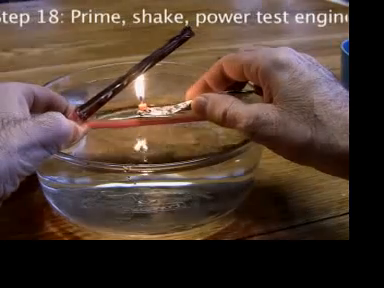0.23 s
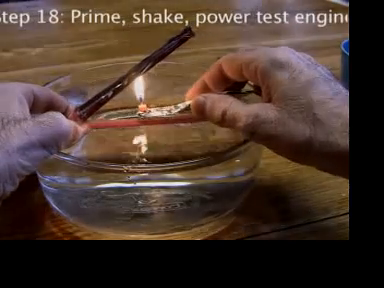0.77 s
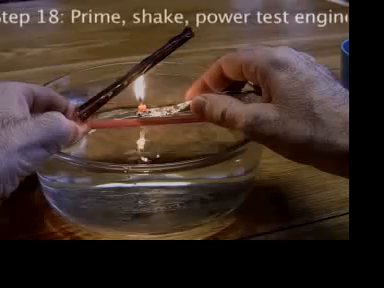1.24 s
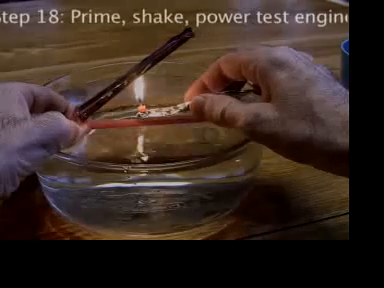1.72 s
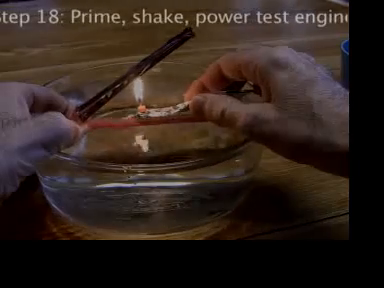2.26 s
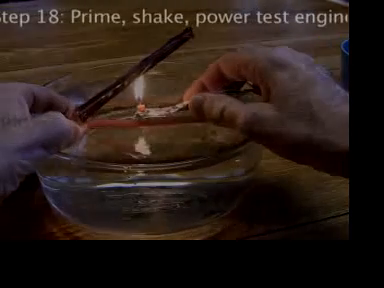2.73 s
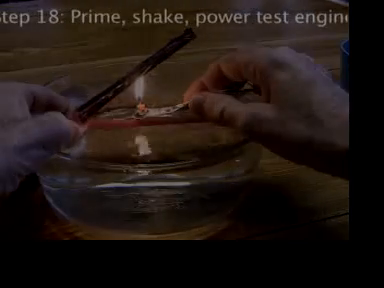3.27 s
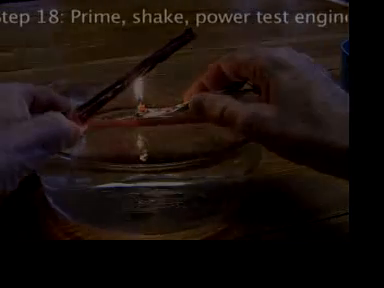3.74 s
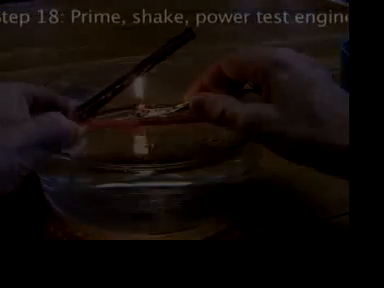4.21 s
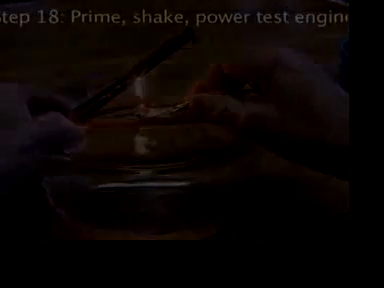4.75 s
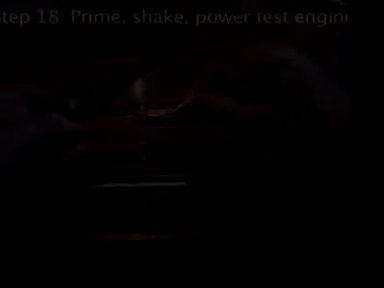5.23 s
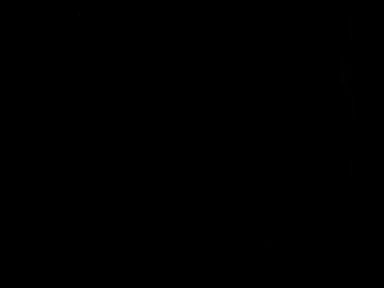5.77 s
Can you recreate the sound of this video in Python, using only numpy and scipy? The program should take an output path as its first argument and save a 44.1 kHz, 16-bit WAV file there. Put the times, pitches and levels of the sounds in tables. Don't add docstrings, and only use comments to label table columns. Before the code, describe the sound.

A thin tin boiler lid over a candle snaps in and out about ten times a second, each cycle a tight cluster of metallic clicks and a lighter tick. It starts quietly, surges to loud, crisp clacking after a second and a half, then weakens and fades by six seconds. Close microphone in a quiet room, with short reflections from bowl and table.

```python
import sys
import numpy as np
from scipy import signal
from scipy.fft import rfft, irfft, next_fast_len
from scipy.io import wavfile
from scipy.ndimage import uniform_filter1d

SR = 44100
rng = np.random.default_rng(int(sys.argv[2]) if len(sys.argv) > 2 else 0)


def gain_from_db(level_db):
    decades = np.asarray(level_db, float) / 20
    return 10 ** decades


def unload_audio(sound):
    columns = np.transpose(np.atleast_2d(sound))
    steps = np.round(np.clip(columns, -1, 1) * 32767)
    wavfile.write(sys.argv[1], SR, steps.astype(np.int16))


N = 264114
GRAIN, ROOM = 900, 9000
LONG = next_fast_len(N + 9000, True)
MUTE = 200
TICK_SLOWER, WEAK_SLOWER = 1.3, 1.1


def colour(x, points):
    hz, db = np.transpose(points)
    f = np.arange(x.shape[-1] // 2 + 1) * SR / x.shape[-1]
    gain = gain_from_db(np.interp(np.log(f + 1), np.log(hz), db, left=-80, right=-80))
    return irfft(rfft(x) * gain / np.sqrt(np.mean(gain ** 2)), x.shape[-1])


# f/Hz, level/dB
AIR = [(30, -15), (120, 0), (1200, -10.5), (8000, -18), (15500, -21)]
# t/s, level/dB
AIR_LEVEL = [(0, -65.5), (1.2, -77), (1.6, -53), (3.4, -56.5), (6.0, -72.5)]


def air():
    mid, side = colour(rng.standard_normal((2, LONG)), AIR)[:, :N]
    t, db = np.transpose(AIR_LEVEL)
    level = gain_from_db(np.interp(np.arange(N) / SR, t, db))
    return level * (mid + 1.3 * side * np.array([[1], [-1]]))


# t/s, dome level/dB
SETTLES = [(0.008, -35), (0.0988, -39), (0.19, -35), (0.5477, -39), (1.009, -39.5), (1.1994, -37),
           (1.294, -31), (1.391, -30), (1.486, -26.5), (1.5793, -24), (1.7696, -19.5), (1.8646, -19),
           (2.047, -24.5), (2.1455, -21), (2.2458, -19.5), (2.3484, -19), (2.449, -18),
           (2.546, -21.5), (2.6485, -18.5), (2.7498, -21.5), (2.8498, -20), (2.9536, -21.0),
           (3.0585, -21.5), (3.161, -20.5), (3.2688, -26), (3.375, -27),
           (3.689, -27), (3.799, -26.5), (3.91, -25.5), (4.0159, -26), (4.119, -27), (4.2227, -23),
                (4.329, -26), (4.434, -25.5), (4.542, -26), (4.64, -23.5), (4.748, -27), (4.854, -26),
                (4.9606, -28), (5.0653, -29), (5.171, -30.5), (5.271, -32), (5.377, -33.5), (5.481, -34)]
# t/s, dome level/dB
STRAYS = [
    (1.136, -44),
    (1.317, -33),
    (3.476, -27),
    (3.5807, -35),
    (4.4293, -37),
    (5.5854, -36),
    (5.6822, -45),
    (5.789, -42),
    (5.8966, -50),
]
# buckle f/Hz; buckle, rim, crack level/dB over the dome
SETTLE = (1840, -1.2, -4.5, -15.5)


def settles():
    t, dome_db = np.transpose(SETTLES + STRAYS)
    hz, buckle, rim, crack_over = SETTLE
    return t, dome_db, hz, dome_db + buckle, dome_db + rim, dome_db + crack_over, TICK_SLOWER


# t/s, dome level/dB
LIFTS = [(0.025, -27.5), (0.122, -31), (0.2166, -28.5), (0.3086, -32), (0.3968, -32.5), (0.48, -37),
         (0.574, -34), (0.6656, -36.5), (0.756, -39), (0.846, -40), (0.9407, -38), (1.036, -36.0),
         (1.129, -37), (1.227, -32), (1.3207, -27), (1.4153, -24), (1.5123, -19.5), (1.6065, -15),
         (1.702, -16), (1.7976, -17), (1.8918, -14), (1.979, -17), (2.0726, -18), (2.1716, -14.5),
         (2.274, -14.5), (2.3754, -16), (2.476, -14.5), (2.5744, -14.5), (2.677, -16), (2.7794, -17),
         (2.88, -15), (2.9829, -16), (3.0885, -17), (3.189, -17.5), (3.297, -20.5), (3.405, -19),
              (3.511, -19), (3.614, -20.5), (3.7151, -23.5), (3.826, -23), (3.937, -19), (4.044, -17.5),
              (4.148, -19), (4.2506, -19), (4.356, -21), (4.461, -21.5), (4.5686, -22.5), (4.668, -20),
              (4.774, -22.5), (4.8814, -24.5), (4.987, -25.5), (5.093, -26.5), (5.196, -28.5), (5.3, -28),
              (5.4063, -31.5), (5.5153, -25), (5.62, -26.5), (5.717, -27.5), (5.824, -30), (5.932, -35.5)]
# buckle f/Hz; buckle, rim, crack level/dB over the dome
LIFT = (2346.5, -4, -15.5, -13.5)
# from t/s, buckle f/Hz, added buckle level/dB
LIFT_SLACK = (5.46, 1840, 2.4)
# until t/s, added buckle level/dB
COLD_LIFT = (1.45, -3)


def lifts():
    t, dome_db = np.transpose(LIFTS)
    hz, buckle, rim, crack_over = LIFT
    slack_from, slack_hz, slack_db = LIFT_SLACK
    cold_until, cold_db = COLD_LIFT
    slack = t > slack_from
    buckle_db = dome_db + buckle + slack * slack_db + cold_db * (t < cold_until)
    return t, dome_db, np.where(slack, slack_hz, hz), buckle_db, dome_db + rim, dome_db + crack_over, TICK_SLOWER


# t/s, buckle level/dB
PULLS_EARLY = [(0.053, -26), (0.1433, -25), (0.2326, -25), (0.323, -28.5), (0.409, -26), (0.499, -30),
               (0.59, -28), (0.6812, -28.5), (0.771, -29), (0.863, -31), (0.96, -32), (1.052, -29),
               (1.147, -32), (1.2444, -25.5), (1.3377, -21), (1.44, -17), (1.533, -13), (1.6239, -8),
               (1.7172, -10), (1.815, -7), (1.9062, -6), (1.998, -11.5), (2.0933, -10.5), (2.1931, -9),
               (2.2934, -7), (2.3948, -7.0), (2.4966, -8), (2.5913, -7), (2.694, -6), (2.7966, -7)]
PULLS_LATE = [(2.8973, -7.5), (3.0012, -7), (3.1072, -7), (3.2072, -7.5), (3.3194, -10), (3.4232, -10),
              (3.524, -13.5), (3.634, -18), (3.738, -16.5), (3.8504, -14), (3.962, -14), (4.0672, -11),
              (4.171, -12.5), (4.284, -13.5), (4.386, -13), (4.4933, -13.5), (4.693, -13), (4.804, -13.0),
              (4.91, -14.5), (5.017, -16.5), (5.1234, -17.5), (5.223, -18), (5.3255, -19.5), (5.429, -21.5),
              (5.534, -26), (5.6337, -30), (5.735, -31.5), (5.841, -35), (5.947, -37)]
# t/s, buckle f/Hz, dome level/dB over the buckle
TENSION = [(0, 1590, 3), (.25, 1944, -2.5), (.6, 1960, -9), (1.2, 1913, -3.5), (1.9, 1938, -6),
           (2.0, 1770, -5.5), (2.7, 1760, -7), (3.3, 1810, -5), (3.55, 1842, -20), (4.07, 1944, -8),
           (4.18, 2150, -6), (4.45, 2360, -9), (5.9, 2221, -19)]
# buckle f/Hz; rim, crack level/dB over the buckle
PULL_EDGE = [(2020, -18, -25), (2130, -4, -12)]


def pulls():
    t, db = np.transpose(PULLS_EARLY + PULLS_LATE)
    tension_t, tension_hz, tension_dome = np.transpose(TENSION)
    hz = np.interp(t, tension_t, tension_hz)
    dome_db = db + np.interp(t, tension_t, tension_dome)
    edge_hz, edge_rim, edge_crack = np.transpose(PULL_EDGE)
    rim_db = db + np.interp(hz, edge_hz, edge_rim)
    crack_db = db + np.interp(hz, edge_hz, edge_crack)
    return t, dome_db, hz, db, rim_db, crack_db, 1


# t/s, level/dB
KNOCKS = [
    (.06, -64),
    (3.488, -49),
    (4.22, -44),
    (4.8, -55),
]


def knocks():
    t = np.arange(N) / SR
    swell = sum(gain_from_db(db) * np.exp(-np.abs(t - at) / 0.027) for at, db in KNOCKS)
    return swell * colour(rng.standard_normal((2, LONG)), [(25, -5), (250, -6)])[:, :N]


# t/s, buckle level/dB, buckle f/Hz, dome level/dB,
# rim level/dB
POPS = [(0.076, -28.5, 1930, -23, -29.5), (0.1741, -29, 1960, -24.5, -33),
        (0.2671, -24.5, 2300, -26, -33.5), (0.3571, -24, 2270, -26.5, -33),
        (0.442, -23, 2260, -30, -35), (0.531, -38, 2300, -33.5, -38), (0.6263, -22, 2320, -27.5, -37),
        (0.717, -25.5, 2250, -29, -34.5), (0.807, -23.5, 2350, -31, -35.5),
        (0.8993, -24, 2350, -31, -37), (0.993, -40, 1840, -34.5, -38.5),
        (1.087, -25.5, 2350, -28.5, -33.5), (1.182, -35, 1930, -34.5, -38.5),
        (1.279, -20, 2343, -23, -26.5), (1.37, -20.5, 2330, -18.5, -30), (1.466, -21.5, 1820, -18, -21),
        (1.563, -17, 1840, -15.5, -17), (1.659, -6.5, 2300, -17, -14), (1.7534, -9, 1940, -16, -14.5),
        (1.85, -8.5, 2357, -11.5, -10.5),
        (1.939, -5, 2310, -13, -12), (2.03, -14, 1890, -25.0, -16), (2.1255, -15, 1840, -14.5, -16.5),
             (2.227, -13.5, 1840, -10, -15.5), (2.3283, -8.5, 2330, -11.5, -9.5),
             (2.429, -8.5, 2365, -10.5, -11.5), (2.5284, -13, 2345, -12, -16.5), (2.63, -7, 1860, -12, -12),
             (2.732, -6, 2334, -6, -20.5), (2.8335, -8.5, 1840, -9.5, -16), (2.9349, -8.5, 2043, -8, -17),
             (3.0408, -7.5, 1930, -12, -18.5), (3.146, -7.5, 1930, -8.5, -14.5),
             (3.251, -9.5, 2328, -10, -12.5), (3.3574, -11, 1810, -11, -14),
             (3.4604, -17, 1920, -15.5, -21), (3.563, -22.0, 1870, -16, -27),
             (3.6675, -17.5, 1920, -23, -29), (3.774, -13, 1760, -29, -22.5),
             (3.885, -15, 1750, -20, -20.5),
        (3.996, -14, 1796, -19, -16.5), (4.1005, -15, 1790, -20, -16.5),
              (4.2028, -17, 2310, -19.5, -21), (4.305, -14, 1764, -18.5, -28), (4.411, -18, 1810, -21, -24),
              (4.517, -18.5, 1810, -24, -26), (4.7242, -18.5, 2130, -43, -26),
              (4.8308, -22, 1960, -30, -25.5), (4.938, -23, 1820, -35, -29.5),
              (5.0447, -25.5, 1840, -24, -31.5), (5.149, -26, 1800, -33, -34),
              (5.2547, -26.5, 1836, -39, -31.5), (5.358, -27, 1750, -31.5, -36),
              (5.464, -26.5, 1860, -26, -33), (5.5707, -34, 1800, -30.5, -34), (5.67, -34, 1860, -34, -37),
              (5.7734, -39.0, 1855, -38, -40.5), (5.8816, -36, 1730, -40.5, -40.5),
              (5.9865, -49, 1810, -37, -45)]
# t/s, crack level/dB of a pop
DRYNESS = [(0, -8.5), (.3, -7.5), (.6, -3.5), (1.15, -5.5), (1.45, -9), (2.0, -11), (2.65, -10.5),
           (2.75, -14.5), (3.05, -16), (3.15, -4), (3.3, -16.5), (4.1, -12), (4.3, -10.5), (6, -13.5)]
WEAK_POP_DB = -5
POP_CRACK_FROM_RIM = 0.61


def pops():
    t, db, hz, dome_db, rim_db = np.transpose(POPS)
    pull_t, pull_db = np.transpose(PULLS_EARLY + PULLS_LATE)
    weak = db < np.interp(t, pull_t, pull_db) + WEAK_POP_DB
    dryness_db = np.interp(t, *np.transpose(DRYNESS))
    crack_db = db + POP_CRACK_FROM_RIM * (rim_db - db) + dryness_db
    return t, dome_db, hz, db, rim_db, crack_db, np.where(weak, WEAK_SLOWER, 1)


# t/s, buckle level/dB, buckle f/Hz, dome level/dB
REPEATS = [(0.239, -30, 1590, -36), (0.328, -29, 2200, -29), (0.599, -29.5, 2140, -36),
           (0.69, -31.5, 2150, -35), (0.777, -36, 2120, -40), (0.876, -33.0, 2130, -34),
           (1.0597, -34, 1600, -33), (1.254, -27.5, 2370, -29), (1.3492, -22.5, 2020, -35),
           (1.7234, -15, 2220, -17), (2.3063, -11.5, 1620, -17), (2.407, -14.5, 1600, -12.5),
           (3.114, -21, 1607, -23), (3.221, -14, 1970, -25), (3.4636, -18.5, 2330, -17),
           (3.8595, -32, 1850, -21)]
# t/s, buckle level/dB, buckle f/Hz, dome level/dB
JOLTS = [
    (3.5113, -16, 1690, -10),
    (3.6134, -15, 2210, -24),
]
# level/dB over the buckle, each
REPEAT_EDGE = (-8.5, -15.5)


def repeats_and_jolts():
    t, db, hz, dome_db = np.transpose(REPEATS + JOLTS)
    rim, crack_over = REPEAT_EDGE
    return t, dome_db, hz, db, db + rim, db + crack_over, 1


# t/s, buckle level/dB, rim level/dB
RAPS = [
    (3.486, -14, -9.5),
    (3.591, -14.5, -12.5),
    (5.492, -26.5, -24.5),
    (5.5901, -29, -26.5),
    (5.69, -33, -29.5),
    (5.7958, -34, -30.5),
    (5.9024, -35.5, -33),
]
# buckle f/Hz, dome level/dB over the row, crack level/dB over the rim, buckle level/dB over the row
RAP = (2468, 1.5, -6, -3.5)
# delay/ms, buckle f/Hz, level/dB
SLAP = (11, 1600, -5.5)


def raps():
    t, db, rim_db = np.transpose(RAPS)
    hz, dome, crack_over, buckle = RAP
    return t, db + dome, hz, db + buckle, rim_db, rim_db + crack_over, 1


def slaps():
    t, db, _ = np.transpose(RAPS)
    delay_ms, hz, step = SLAP
    return t + delay_ms / 1000, db - MUTE, hz, db + step, db + 2 * step, db + 3 * step, 1


def strokes():
    kinds = pulls(), pops(), lifts(), settles(), raps(), slaps(), repeats_and_jolts()
    return np.hstack([np.broadcast_arrays(*kind) for kind in kinds])


RING_MS = 4.5


def bursts(s, db, waves, rise_ms, delay_ms, ring_db=-30):
    t = np.arange(GRAIN) / SR * 1000 / rise_ms[:, None]
    swell = (t * np.exp(1 - t)) ** 2.54
    ring = (1 - np.exp(-t ** 2)) * np.exp(-t * rise_ms[:, None] / RING_MS)
    shape = swell + gain_from_db(ring_db) * ring
    out = np.zeros(N + 2 * GRAIN)
    at = ((s + delay_ms / 1000) * SR).astype(int)[:, None] + np.arange(GRAIN)
    np.add.at(out, at, gain_from_db(db)[:, None] * shape * waves)
    return out[:N]


# delay/ms, level/dB
ECHOES = [(7.9, -2), (14.5, -11.5)]
TREBLE_T60_S = 0.26


def room(x, echo_db, tail_db, t60, side_db):
    t = np.arange(ROOM) / SR
    grit = rng.standard_normal((2, ROOM)) * gain_from_db(4.25 * rng.standard_normal((2, ROOM)))
    dull = uniform_filter1d(grit, size=3)
    grit = dull + (grit - dull) * gain_from_db(-60 * t / TREBLE_T60_S)
    mid, side = grit * gain_from_db(tail_db - 15 - 60 * t / t60) * np.clip(t / .006, 0, 1)
    mid[0] = 1
    for ms, db in ECHOES:
        mid[int(ms * SR / 1000)] += gain_from_db(db + echo_db)
    slope = np.gradient(np.roll(mid, 2)) * SR / (2 * np.pi * 2500)
    side = gain_from_db(side_db) * (1.6 * side - slope)
    return rfft(x, LONG) * rfft(np.array([mid + side, mid - side]), LONG)


def mode(s, db, voice, hz=0.95, sign=1, slower=0.83):
    centre_hz, rise_ms, delay_ms, gain_db, *space, ring_db = voice
    chance = rng.standard_normal((len(s), 3))
    hz = hz * centre_hz * np.exp(.025 * chance[:, 0])
    phase = 0.61 * chance[:, 1:2]
    waves = sign * np.sin(2 * np.pi * hz[:, None] * np.arange(GRAIN) / SR + phase)
    rise_ms = slower * rise_ms * np.exp(0.15 * chance[:, 2])
    return room(bursts(s, db + gain_db, waves, rise_ms, delay_ms, ring_db), *space)


# rise/ms, delay/ms, gain/dB, echo level/dB, tail level/dB, tail t60/s, side level/dB
CRACK = (1.1951, 0.41, 1.85, -17, -25.5, 0.32, -9.5)
# f/Hz, level/dB
CRACK_COLOUR = [(3800, 3.5), (4500, -2.5), (6100, -1.3), (7100, -9.5), (9000, -14), (12000, -21),
                (16300, -32)]
# f/Hz, level/dB
PULL_COLOUR = [(3900, 4.5), (4500, 2), (5100, 4), (6500, -14), (8500, -4), (12000, -20), (16300, -29.5)]


def crack(s, db, soft, pull):
    rise_ms, delay_ms, gain_db, echo_db, tail_db, t60, side_db = CRACK
    noise = rng.standard_normal((2, len(s), GRAIN))
    waves = np.where(pull[:, None], colour(noise, PULL_COLOUR), colour(noise, CRACK_COLOUR))
    mid, side = np.where(soft[:, None], uniform_filter1d(waves, size=3), waves)
    side = side - np.roll(side, 1, axis=1)
    mid, side = (bursts(s, db + gain_db, wave, rise_ms + 0 * s, delay_ms) for wave in (mid, side))
    centre = room(mid, echo_db, tail_db, t60, -26.5)
    return centre + gain_from_db(side_db) * rfft(side, LONG) * np.array([[1], [-1]])


# f/Hz (1 where each event tunes it), rise/ms, delay/ms, gain/dB,
# echo level/dB, tail level/dB, tail t60/s, side level/dB, ring level/dB
THUMP = (510, 0.86, 0.13, -10, -17, -21, 0.21, -17.5, -16)
DOME = (1, 1.02, 0.79, 0, -7, -25, 0.27, -24, -10)
DOME_TICK = (1, 2, 0.96, 0.73, -7, -23, 0.3, -29, -20)
RIM = (1, 1.33, 0.79, 1.48, -7, -27.5, 0.32, -19.5, -16.5)
TAUT = (1, 1.8, 0.5, 1.5, -24, -28, 0.2, -26, -17.5)
SLACK = (1, 0.55, 0.52, 2.5, -11, -23, 0.27, -23, -11)
BOWL = (915, 5., 9, -17.5, -44, -26, 0.95, -20, -32)
# buckle f/Hz, dome f/Hz, rim f/Hz
TUNING = [(1745, 1380, 3206), (2342, 1172, 3250), (2403, 835, 3080)]
# delay/ms, level/dB
REBOUND = (4.52, -7.5)
REBOUND_CRACK_MS, REBOUND_CRACK_DB = 4.5, -8
SETTLE_DOME_HZ = 1088
BOWL_TAUT_DB, PULL_QUICKER = -4.5, 0.72


def boiler():
    s, dome_db, buckle_hz, buckle_db, rim_db, crack_db, slower = strokes()
    tuning_hz, tuning_dome, tuning_rim = np.transpose(TUNING)
    rim_hz = np.interp(buckle_hz, tuning_hz, tuning_rim)
    dome_hz = np.interp(buckle_hz, tuning_hz, tuning_dome)
    settling = buckle_hz == SETTLE[0]
    dome_hz = np.where(settling, SETTLE_DOME_HZ, dome_hz) * np.exp(0.038 * rng.standard_normal(len(s)))
    dome_db = dome_db - 2.1 * settling
    tick = slower == TICK_SLOWER
    pull = np.arange(len(s)) < len(PULLS_EARLY + PULLS_LATE)

    lid = mode(s[tick], dome_db[tick], DOME_TICK, dome_hz[tick], -1.056)
    lid = lid + mode(s[~tick], dome_db[~tick], DOME, dome_hz[~tick], -1.056)

    taut = buckle_hz > 2130
    pace = np.where(pull & taut, PULL_QUICKER, 1) * 0.75
    lid += mode(s, buckle_db - MUTE * ~taut, TAUT, buckle_hz, slower=pace)
    lid += mode(s, buckle_db - MUTE * taut, SLACK, buckle_hz, slower=pace)
    again = pull & (buckle_hz < 1930) & (rim_db < buckle_db - 12)
    bounce_ms, bounce_db = REBOUND
    again_db = buckle_db + bounce_db - MUTE * ~again
    lid += mode(s + bounce_ms / 1000, again_db, SLACK, 0.84 * buckle_hz, slower=0.78)

    lid += mode(s, buckle_db, THUMP, 2 ** rng.uniform(-0.32, 0.35, len(s)), -0.92)
    lid += mode(s, rim_db, RIM, rim_hz)
    inward = pull | (buckle_hz == RAP[0])
    bowl_db = buckle_db + BOWL_TAUT_DB * (pull & taut)
    lid += mode(s[inward], bowl_db[inward], BOWL)

    edge_s = np.r_[s, s[again] + REBOUND_CRACK_MS / 1000]
    edge_db = np.r_[crack_db, crack_db[again] + REBOUND_CRACK_DB]
    soft = np.r_[(slower > 1) | again, again[again]]
    lid += crack(edge_s, edge_db, soft, np.r_[pull, pull[again]])
    return irfft(lid, LONG)[:, :N]


def scene():
    no_bass = signal.butter(3, 140, "high", fs=SR, output="sos")
    return signal.sosfilt(no_bass, boiler()) + knocks() + air()


STARVED_SHARE, STARVED_FROM_HZ, STARVED_DB = 0.3, 7500, 3.5


def starve(x):
    hz, t, cells = signal.stft(x, SR, nperseg=256)
    db = 20 * np.log10(np.abs(cells) + 1e-9)
    usual = uniform_filter1d(uniform_filter1d(db, size=41, axis=2), size=5, axis=1)
    moments = len(t) // 8 + 1
    short = np.repeat(rng.random(moments) < STARVED_SHARE, 8)[:len(t)]
    edge = STARVED_FROM_HZ * np.repeat(rng.uniform(1, 1.5, moments), 8)[:len(t)]
    faint = short & (hz[:, None] > edge) & (db.max(axis=0) < usual + STARVED_DB + 6)
    return signal.istft(cells * ~faint, SR, nperseg=256)[1][:, :N]


def band_limit(x):
    return signal.sosfilt(signal.butter(12, 16970, fs=SR, output="sos"), x)


def record(dry):
    rounded = 1.236 * np.tanh(dry / 1.373)
    return band_limit(starve(rounded))


dry = scene()
out = record(dry)
unload_audio(out)
```